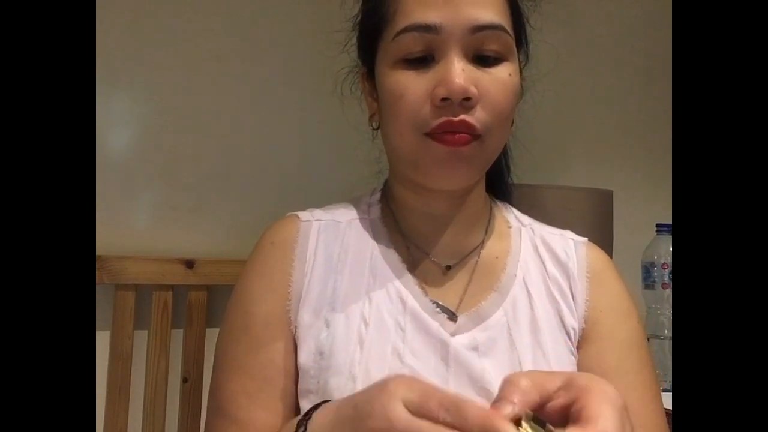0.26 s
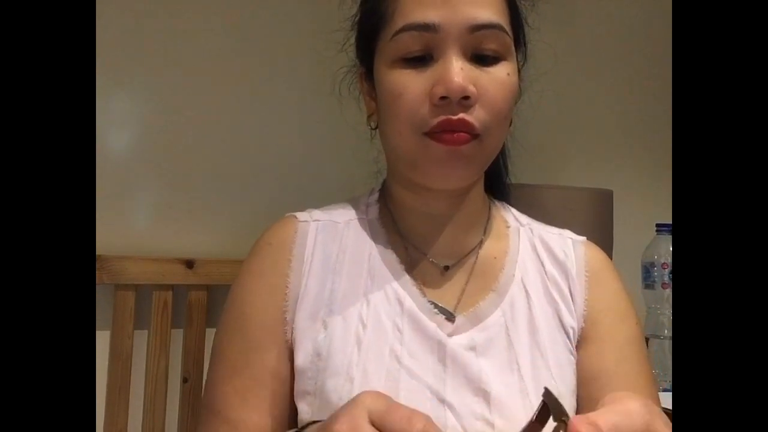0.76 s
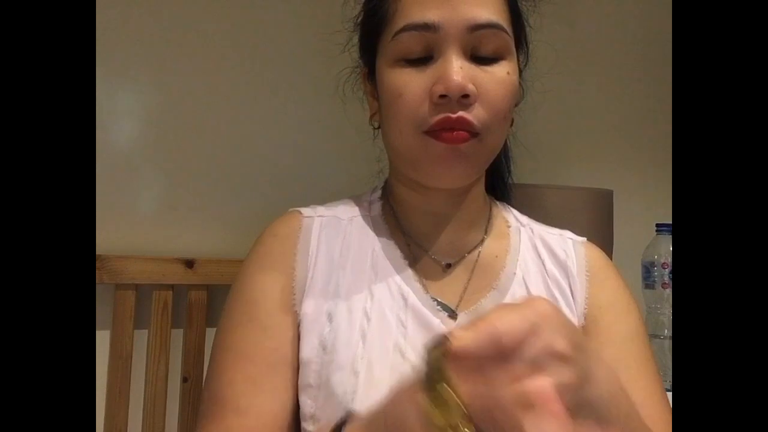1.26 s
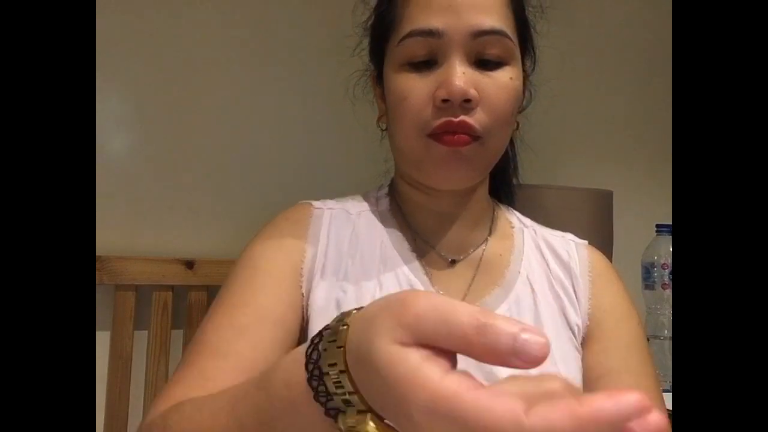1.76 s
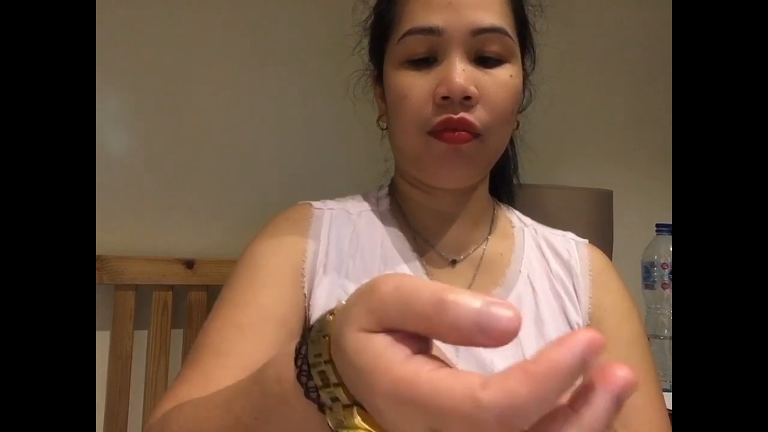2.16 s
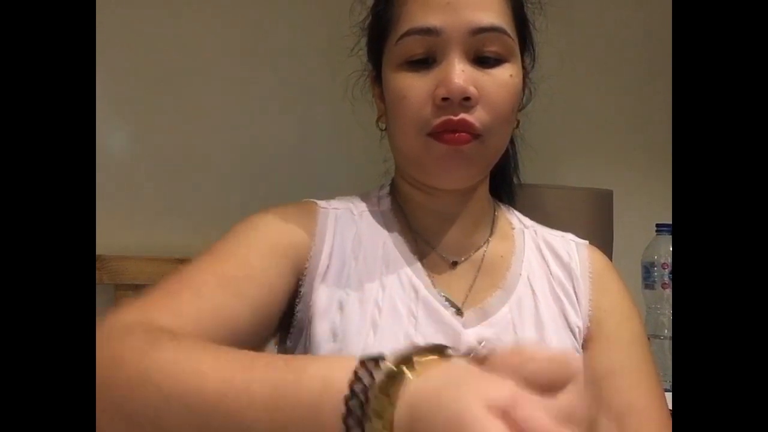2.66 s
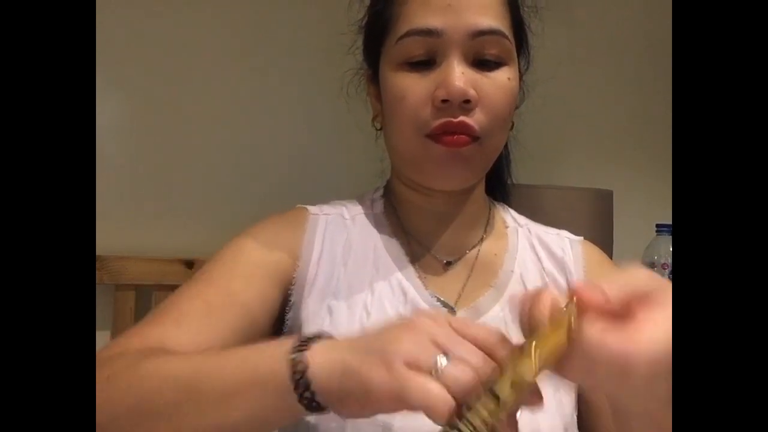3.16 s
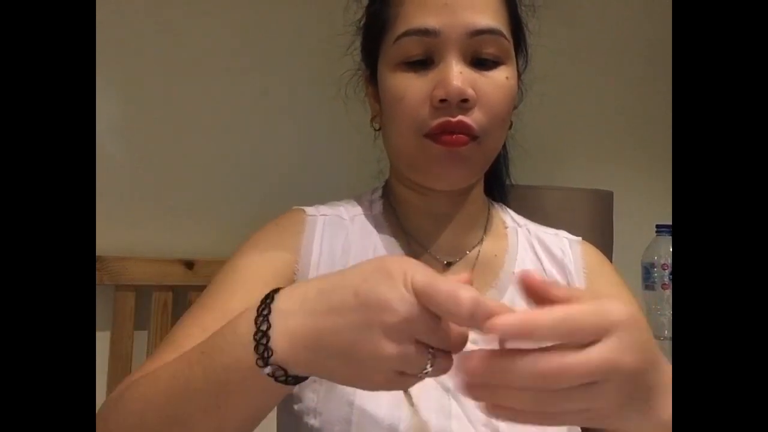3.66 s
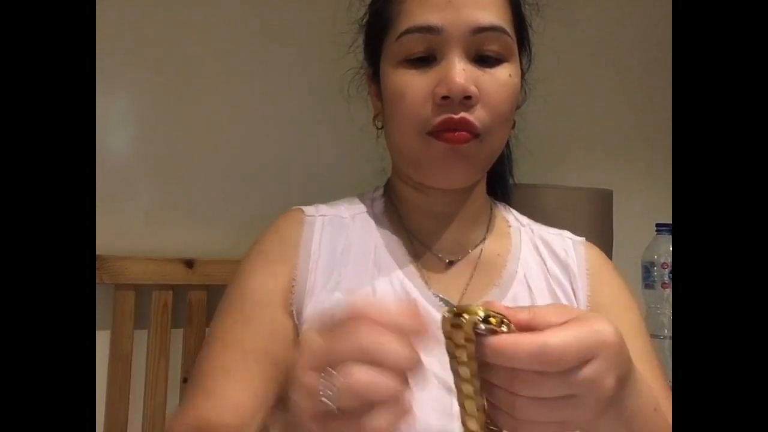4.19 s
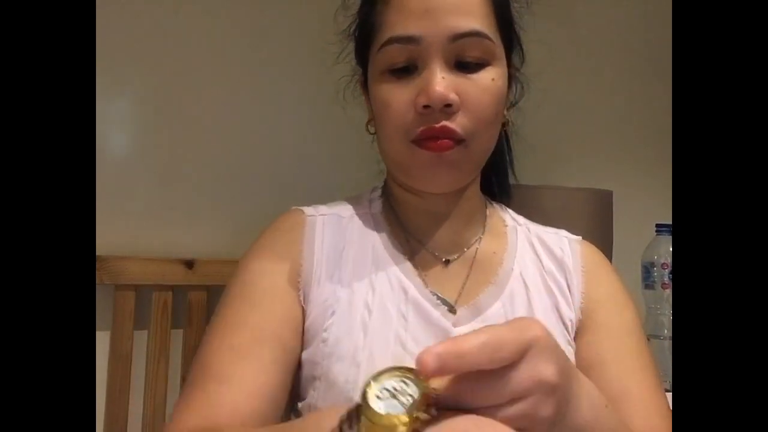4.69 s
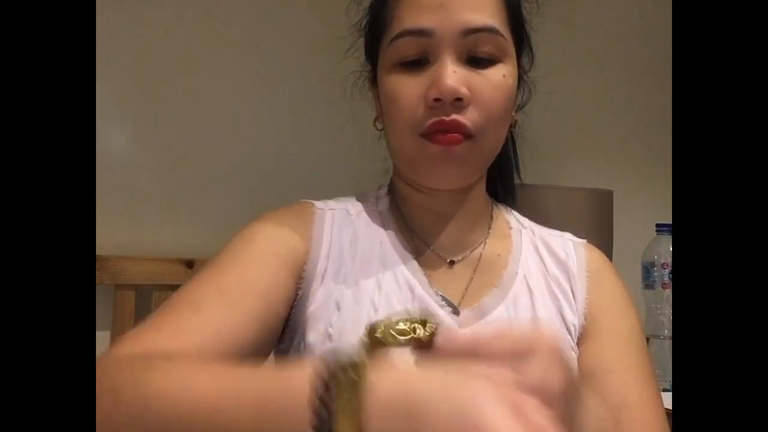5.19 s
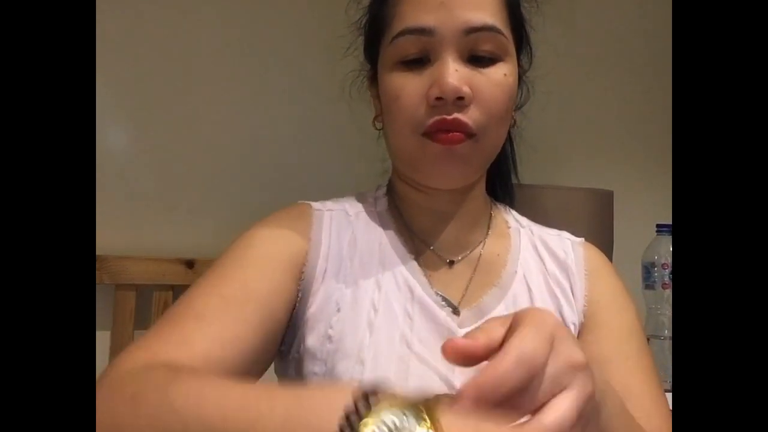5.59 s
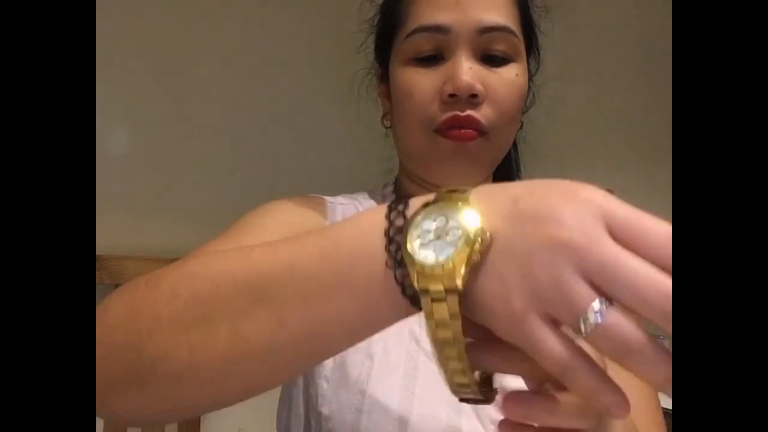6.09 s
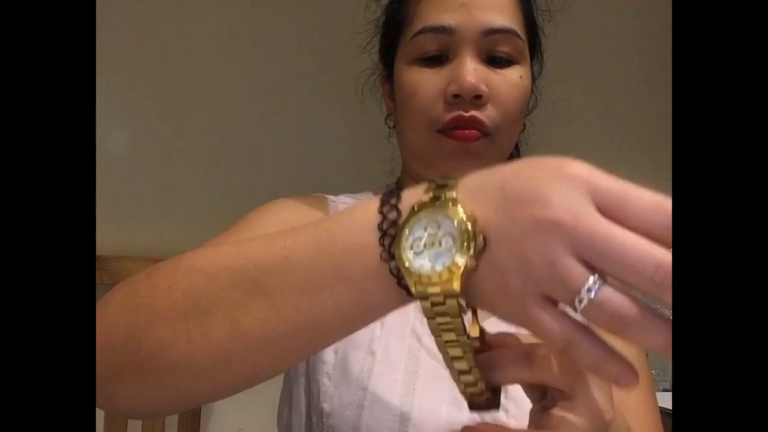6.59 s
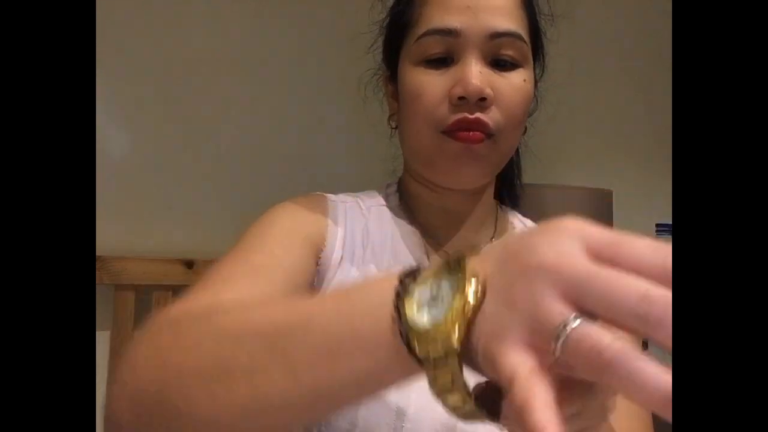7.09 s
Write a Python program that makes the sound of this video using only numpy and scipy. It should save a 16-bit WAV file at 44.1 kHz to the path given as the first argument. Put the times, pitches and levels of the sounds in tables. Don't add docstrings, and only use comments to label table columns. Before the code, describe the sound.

Close, dry handling of a metal watch band: short damped clicks with tiny high rings, small dull knocks from the case and fine jingling links. Two strong clicks come early, another near one second, and sharp snaps in the middle; later the touches are fainter and more scattered, with a dull knock and click near the end. Steady low duct rumble and faint hiss lie beneath, in a small furnished room.

```python
import sys
import numpy as np
from scipy import signal
from scipy.fft import rfft, irfft
from scipy.io import wavfile
from scipy.ndimage import uniform_filter1d

SR = 44100
rng = np.random.default_rng(int(sys.argv[2]) if len(sys.argv) > 2 else 0)


def bounce(signal):
    frames = np.transpose(np.atleast_2d(signal))
    limited = np.clip(frames, -1, 1)
    pcm = np.round(limited * 32767).astype(np.int16)
    wavfile.write(sys.argv[1], SR, pcm)


def volts_from_db(level):
    exponent = np.asarray(level, float) / 20
    return 10 ** exponent


N = 323717
BLOW_N = 1800
BLOW_T = np.arange(BLOW_N) / SR


def rms_one(x):
    return x / np.sqrt(np.mean(x ** 2) + 1e-20)


def in_time(rows):
    s, value = np.transpose(rows)
    return np.interp(np.arange(N) / SR, s, value)


def at_hz(points, hz):
    table_hz, value = np.transpose(points)
    return np.interp(np.log(hz), np.log(table_hz), value)


def band(x, low_hz, high_hz, order=2):
    edges = [low_hz, min(high_hz, .45 * SR)]
    return signal.sosfilt(signal.butter(order, edges, "band", fs=SR, output="sos"), x)


def dip(x, hz, sharpness, depth):
    peak = signal.lfilter(*signal.iirpeak(hz, sharpness, fs=SR), x)
    return x - np.clip(depth, 0, 1) * peak


def steady(spectrum):
    hz = np.maximum(np.fft.rfftfreq(N, 1 / SR), 1)
    white = rfft(rng.standard_normal(N))
    return rms_one(irfft(white * volts_from_db(at_hz(spectrum, hz)), N))


# t/s, level/dB
RUMBLE_SWELL = [(0, -44), (.7, -43), (1.0, -41), (1.4, -43), (1.62, -41.5), (1.9, -44), (4.3, -42.5),
                (4.6, -44.5), (5.1, -42.5), (5.9, -43.5), (6.4, -43), (6.6, -45), (7.25, -40.5),
                (7.34, -45.5)]
# f/Hz, density/dB per Hz
RUMBLE_COLOUR = [(8, -12.5), (15, -16.5), (24, 3), (31, -3.5), (40, -0.5), (50, 4.5), (62, 0), (79, -7.5),
                 (99, -12), (120, -40), (170, -37), (300, -87)]


def ventilation():
    return volts_from_db(in_time(RUMBLE_SWELL)) * steady(RUMBLE_COLOUR)


# f/Hz, density/dB per Hz
AIR_COLOUR = [(65, -54), (110, -5), (141, -9.5), (224, -8.5), (348, -16), (404, -17), (576, -25),
              (1250, -27.5), (4140, -31.5), (4890, -32.5), (8610, -33), (10400, -33.5), (11300, -34.5),
              (15200, -32.5), (16500, -38)]


def air_and_hiss():
    return volts_from_db(-61.5) * steady(AIR_COLOUR)


# t/s, level/dB
HANDLING = [(0.0, -83), (0.8, -76), (1.04, -54), (1.29, -53), (1.47, -71), (1.71, -57.5), (1.95, -79),
            (2.3, -69), (2.7, -52.5), (3.02, -71), (3.5, -51.5), (3.8, -78), (4.03, -59), (4.6, -57.5),
            (5.2, -66), (5.87, -58), (6.25, -70), (7.34, -77)]
# f/Hz, level/dB, t60/s
SMALL_LINKS = [(4100, -8, .004), (6100, -8, .004), (7300, -8, .004), (8450, -12, .01), (9400, -4, .006),
               (11500, 0, .004), (12600, -1, .004), (13700, 0, .004), (15300, -2, .006)]


def chatter(per_s, spread_db):
    sizes = volts_from_db(spread_db * np.minimum(rng.exponential(1, N), 3)) * rng.choice([-1, 1], N)
    touches = sizes * (rng.random(N) < per_s / SR) + 1e-18
    wash = volts_from_db(-5.0) * band(touches, low_hz=7100, high_hz=15800)
    wash = wash + volts_from_db(3.5) * band(touches, low_hz=1500, high_hz=5900)
    for hz, level_db, t60 in SMALL_LINKS:
        decay = volts_from_db(-60 / (t60 * SR))
        turn = 2 * np.pi * hz / SR
        struck = touches * rng.standard_normal(N)
        gain = volts_from_db(level_db - 10.0) * np.sin(turn)
        wash = wash + signal.lfilter([0, gain], [1, -2 * decay * np.cos(turn), decay ** 2], struck)
    return volts_from_db(in_time(HANDLING) - 14.5) * rms_one(wash)


# f/Hz, t60/s
ROOM_T60 = [(1000, 0.22), (2600, 0.25), (7000, 0.27), (15000, 0.28)]


def room_tail(size):
    t = np.arange(size) / SR
    tail = np.zeros(size)
    for hz in 600 * 2. ** np.arange(6):
        octave = band(rng.standard_normal(size), hz / np.sqrt(2), hz * np.sqrt(2))
        tail += octave * volts_from_db(-60 * t / at_hz(ROOM_T60, hz))
    tail = tail * (1 - np.exp(-(t / 0.0048) ** 2))
    return tail / np.sqrt(np.sum(tail ** 2))


# delay t/s, level/dB
ECHOES = [
    (.003, -15),
    (.0007, -13),
    (.0016, -13),
    (.0095, -17),
]


def near_echoes(x):
    return x + sum(volts_from_db(db) * np.roll(x, round(s * SR)) for s, db in ECHOES)


def contact(rebound_db, t60):
    touch = volts_from_db(rebound_db - 60 * BLOW_T / t60) * rng.standard_normal(BLOW_N)
    touch[0] = 1
    return touch


def ring(hz, t60):
    mode = volts_from_db(-60 * BLOW_T / t60) * np.sin(2 * np.pi * hz * BLOW_T)
    return band(mode, low_hz=.75 * hz, high_hz=1.35 * hz, order=3)


def add(direct, feed, s, sound, radiated, room_db):
    at = slice(round(s * SR), round(s * SR) + BLOW_N)
    direct[at] += sound
    feed[at] += volts_from_db(room_db + 19.5) * radiated


# t/s, level/dB
BLADE = [
    (0.912, -46),
    (1.0281, -58),
    (1.4165, -54),
    (2.181, -52),
    (3.19, -54),
    (3.2893, -41),
    (4.0024, -48),
    (4.0837, -49),
    (4.5185, -50),
    (7.0722, -53),
]


def clasp_blade(direct, feed):
    for s, level_db in BLADE:
        blade = volts_from_db(level_db) * ring(hz=8470, t60=0.022)
        add(direct, feed, s, blade, blade, room_db=-18.5)


# t/s, level/dB, f/Hz, t60/s, room share/dB
PLATES = [(.3547, -47, 1750, .008, -24), (.3547, -44, 4520, .004, -23), (.3742, -33, 8300, .003, -27),
          (.3547, -44, 6100, .003, -22), (.4698, -40, 2500, .003, -27), (.4698, -39, 3940, .006, -24),
          (.4698, -44, 5800, .02, -23), (.4816, -41, 6800, .01, -20), (.4698, -40, 8050, .006, -22),
          (1.1312, -41, 4040, .007, -17), (1.1325, -30, 6050, .012, -16), (1.1312, -38, 8100, .007, -15),
          (2.7629, -46, 1300, .01, -24), (2.7629, -47, 1890, .01, -21), (2.7629, -43, 2570, .012, -20),
          (2.7629, -46, 5300, .005, -16), (2.7629, -44, 6400, .006, -20), (3.516, -50, 3370, .02, -20),
          (3.5142, -40, 8200, .012, -20), (3.516, -54, 4300, .006, -22), (4.2483, -43, 12100, .006, -24),
          (4.364, -55, 4100, .012, -26), (4.422, -60, 3900, .008, -16), (4.497, -54, 9600, .012, -22),
          (4.505, -53, 9500, .008, -24), (4.5195, -49, 9500, .015, -16), (5.2314, -49, 6700, .012, -20),
          (5.2314, -57, 3700, .012, -18), (5.101, -53, 7000, .008, -20), (6.849, -53, 1900, .008, -24),
          (6.853, -57, 2800, .02, -22), (6.8413, -47, 6300, .008, -20), (.7958, -50, 6200, .005, -22),
          (1.273, -53, 8450, .015, -22), (1.2875, -52, 6800, .005, -18), (1.2865, -49, 13800, .004, -20),
          (2.2755, -53, 8700, .03, -18), (6.85, -45, 15400, .006, -20), (1.5215, -51, 7300, .006, -24),
          (6.0815, -55, 6300, .005, -14)]


def plates(direct, feed):
    for s, level_db, hz, t60, room_db in PLATES:
        plate = volts_from_db(level_db) * ring(hz, t60)
        add(direct, feed, s, plate, plate, room_db)


# t/s, level/dB, f/Hz, room share/dB
PARTS = [(0.3545, -29, 2920, -30), (.3547, -39, 5170, -24), (.3547, -40, 500, -35),
         (0.4696, -24, 13000, -22), (0.4696, -23, 10830, -26), (0.912, -39, 4630, -35),
         (1.1313, -24.5, 5530, -22), (1.1312, -30, 6860, -8.5), (1.1314, -34, 10200, -26),
         (1.5192, -26, 15800, -29), (1.7565, -42, 7270, -15.5), (1.9037, -38, 15500, -23),
         (2.531, -49, 5800, -15), (2.7612, -42, 2880, -23), (3.289, -40, 6100, -28),
         (3.2898, -39.5, 4060, -34), (3.2891, -20, 13500, -46), (3.2891, -21, 9370, -32),
         (3.5142, -45, 5700, -26), (3.5158, -29, 8700, -24), (4.2397, -32.5, 8470, -29),
         (4.4147, -53, 3940, -12), (5.271, -54, 2780, -18), (6.829, -46, 3900, -30),
         (6.8361, -47, 6240, -21), (6.8405, -42.5, 2360, -17), (6.8397, -47, 6400, -19),
         (6.8397, -34, 12800, -16), (7.3294, -45.5, 3400, -25), (7.33, -34, 14500, -14)]


def small_parts(direct, feed):
    for s, level_db, hz, room_db in PARTS:
        part = volts_from_db(level_db) * ring(hz, t60=0.0047)
        add(direct, feed, s, part, part, room_db)


# t/s, level/dB, room share/dB
THUDS = [(0.3547, -40, -22.5), (0.3742, -55, -28), (0.4693, -43.5, -24.5), (0.4813, -60, -17),
         (0.914, -64, -14), (1.028, -60.5, -11.5), (1.1312, -56, -13), (2.171, -61, -23),
         (2.7629, -46.5, -21), (3.5142, -56.5, -20), (4.0025, -60.5, -24), (4.0837, -62, -15),
         (4.2391, -62, -18), (4.311, -60, -15), (4.4163, -76, -26), (5.273, -55, -17.5),
         (5.8458, -59.5, -16.5), (5.891, -62, -18), (6.4343, -47, -25), (6.444, -65, -23),
         (6.8397, -50.5, -16.5)]


def case_thuds(direct, feed):
    case_hz = 1870
    for s, thud_db, room_db in THUDS:
        case = band(contact(rebound_db=-24, t60=.006), low_hz=.4 * case_hz, high_hz=2.1 * case_hz)
        case = volts_from_db(thud_db + 25) * case
        add(direct, feed, s, case, case, room_db)


# f/Hz, t60/s
RING_T60 = [(4000, .004), (6200, .005), (7300, .006), (8450, .016), (9400, .007), (11000, .004),
            (13500, .003), (15300, .005)]
# t/s, crack level/dB, link f/Hz, clasp body/dB, room share/dB
FITTING_KNOCKS = [(0.3543, -33, 13700, -9.5, -20), (0.3737, -33, 12700, -9, -26),
                  (0.4696, -24.5, 10940, -14, -17), (0.4816, -30, 6400, -12, -22),
                  (0.7955, -42.5, 13200, -13.5, -16.5), (0.9127, -32, 9300, -16, -19),
                  (0.9222, -39, 8470, -24, -13), (0.964, -47.5, 13500, -11, -10.5),
                  (1.0284, -37, 8370, -15, -15), (1.033, -38, 14100, -21, -19),
                  (1.0575, -39, 14000, -22, -31), (1.1311, -27, 6470, -28, -21),
                  (1.239, -44, 13500, -17, -31), (1.2805, -36.5, 13400, -14.5, -21),
                  (1.2916, -41, 14300, -17, -29), (1.416, -46.5, 9650, -13, -13.5),
                  (1.5192, -49.5, 15800, -18, -13.5), (1.5544, -43.5, 8970, -21, -18),
                  (1.757, -45, 15500, -22, -20), (1.9037, -52, 15600, -22, -20),
                  (2.3173, -44, 10700, -12.5, -17.5), (2.531, -39.5, 12700, -23, -25)]
# t/s, crack level/dB, link f/Hz, clasp body/dB, room share/dB
TURNING_KNOCKS = [(2.7341, -45, 11000, -14, -36), (2.7629, -33.5, 11900, -17, -17.5),
                  (3.1896, -41, 13600, -17, -20), (3.2105, -44.5, 14500, -12, -25),
                  (3.2891, -25.5, 9370, -20, -23), (3.4222, -44.5, 11610, -16, -25),
                  (3.4704, -39, 13370, -22, -21), (3.4768, -39, 9500, -17, -21),
                  (3.5142, -26, 11800, -18, -16), (3.7649, -38, 14900, -19, -21),
                  (3.7674, -41, 9200, -24, -16.5), (3.9552, -45, 12000, -14.5, -19),
                  (4.0023, -32, 14400, -20, -18), (4.0434, -38, 14400, -26, -21),
                  (4.0837, -33, 12300, -15.5, -19), (4.2391, -30, 15100, -21, -21.5),
                  (4.2483, -49, 14700, -20, -22), (4.329, -46, 13500, -12.5, -10),
                  (4.3347, -42, 14500, -14, -19), (4.4163, -38.5, 15000, -13.5, -18),
                  (4.5195, -44, 9500, -17, -19), (4.6583, -46, 12500, -14.5, -14)]
# t/s, crack level/dB, link f/Hz, clasp body/dB, room share/dB
SHOWING_KNOCKS = [(5.0961, -47, 13630, -10, -14), (5.2312, -37, 9650, -21.5, -11.5),
                  (5.273, -37.5, 7330, -10.5, -23), (5.347, -46, 11330, -22, -19),
                  (5.377, -45.5, 8440, -22, -13.5), (5.7586, -39.5, 10100, -23, -13),
                  (5.808, -43, 13540, -17, -22), (5.8457, -47, 13650, -16, -20),
                  (5.8914, -42, 11460, -17, -24), (5.9245, -48, 13700, -15, -31),
                  (5.9522, -43, 10100, -20, -12), (6.435, -47.5, 12100, -1.5, -20.5),
                  (6.6513, -45.5, 11600, -8.5, -24), (6.8397, -35, 15000, -11, -15),
                  (7.3294, -33.5, 12300, -22, -14)]
# t/s, crack level/dB, link f/Hz
EARLY_TICKS = [(0.033, -47.5, 6500), (0.628, -52, 11800), (0.6986, -57, 13310), (0.76, -56, 13850),
               (0.828, -45, 12550), (0.9934, -50, 14000), (1.0194, -46, 15310), (1.506, -51, 11000),
               (1.6641, -46.5, 14470), (1.7075, -51, 12500), (1.7424, -56, 12580), (2.154, -56, 5000),
               (1.92, -47.5, 10830), (2.1708, -48, 11900), (2.182, -45.5, 14600), (2.275, -48, 14000),
               (2.486, -54, 12830), (2.7524, -54, 11630), (2.9464, -48, 11800), (2.9546, -55, 15290),
               (3.017, -48, 10060), (3.0377, -54, 12420), (3.2385, -46, 8400), (3.258, -45, 11500),
               (3.4066, -49, 13650), (3.419, -48, 14130), (3.4666, -52, 9860), (3.7105, -49.5, 13600)]
# t/s, crack level/dB, link f/Hz
LATE_TICKS = [(4.199, -51, 7100), (4.3105, -54, 5540), (4.318, -42, 14320), (4.495, -47, 9500),
              (4.5975, -53, 11740), (4.6288, -45.5, 9600), (4.8303, -47.5, 11480), (5.001, -52, 11800),
              (5.061, -53, 15200), (5.108, -53, 9000), (5.4057, -52, 8400), (5.522, -51.5, 13000),
              (5.74, -50, 11800), (5.8, -47, 9300), (5.8391, -45, 13630), (5.8846, -46, 14500),
              (6.076, -48.5, 6900), (6.2222, -47, 11400), (6.226, -49, 13800), (6.2758, -52, 11500),
              (6.316, -54, 14200), (6.444, -48, 7150), (6.6676, -54, 9170), (6.9758, -50.5, 8100),
              (7.073, -51, 8240), (7.1184, -50, 8900), (7.218, -54.5, 6610), (7.3234, -51, 8770)]
# t/s, crack level/dB, link f/Hz
REBOUNDS = [(1.046, -50, 15000), (1.166, -42, 12400), (1.7585, -47, 15500), (1.7586, -43.5, 14100),
            (1.769, -42, 15500), (1.803, -49, 12500), (1.913, -49.5, 10700), (4.409, -47, 8660),
            (5.233, -42, 15000), (5.2776, -43, 13600), (5.272, -47, 11600), (5.773, -54, 12000),
            (5.8465, -54, 13200), (6.8362, -48, 13500), (6.8413, -41, 12100), (6.866, -41, 15500)]


def link_knocks(direct, feed):
    impulse = 1. * (BLOW_T == 0)
    even_bright = volts_from_db(12) * band(impulse, low_hz=7630, high_hz=20200, order=6)
    even_clasp = band(impulse, low_hz=3240, high_hz=7030, order=3)
    even_clasp = volts_from_db(25.0) * dip(even_clasp, hz=5060, sharpness=4.5, depth=0.3)

    blows = [(s, db, hz, 1, clasp_db, room_db)
             for s, db, hz, clasp_db, room_db in FITTING_KNOCKS + TURNING_KNOCKS + SHOWING_KNOCKS]
    blows += [(s, db, hz, -1.5, -15.5, -18) for s, db, hz in EARLY_TICKS + LATE_TICKS]
    blows += [(s, db, hz, 4, -19, -18.5) for s, db, hz in REBOUNDS]

    for s, crack_db, ring_hz, ring_db, clasp_db, room_db in blows:
        touch = contact(rebound_db=-12, t60=.006)
        bright = volts_from_db(9.5) * band(touch, low_hz=8100, high_hz=18700, order=6)
        clasp = volts_from_db(clasp_db + 22.5) * band(touch, low_hz=2900, high_hz=8100, order=3)
        t60 = at_hz(RING_T60, ring_hz)
        link = volts_from_db(ring_db + 3) * np.sqrt(0.0047 / t60) * ring(ring_hz, t60)
        sound = bright + clasp + link
        radiated = even_bright + volts_from_db(clasp_db) * even_clasp + volts_from_db(-7.5) * link
        add(direct, feed, s, volts_from_db(crack_db) * sound, volts_from_db(crack_db) * radiated, room_db)


def scene():
    background = ventilation() + air_and_hiss()
    small = chatter(per_s=1000.0, spread_db=-2.0)
    direct, feed = np.zeros((2, N + BLOW_N))
    for source in (clasp_blade, plates, small_parts, case_thuds, link_knocks):
        source(direct, feed)
    direct, feed = direct[:N], feed[:N]
    room = signal.fftconvolve(feed + volts_from_db(2.5) * small, room_tail(size=16000))[:N]
    return (near_echoes(direct) + room + small + background)[None]


def top_cut(x):
    return signal.sosfilt(signal.butter(12, 16960, fs=SR, output="sos"), x)


def record(dry):
    dipped = dip(dry, hz=10340, sharpness=20.0, depth=0.48)
    stepped = signal.sosfilt(signal.cheby2(18, 32, 15960, fs=SR, output="sos"), dipped)
    top = band(dipped, low_hz=15950, high_hz=17500, order=8)
    sudden = uniform_filter1d(top ** 2, size=100) > volts_from_db(16) * uniform_filter1d(top ** 2, size=2000)
    stepped = stepped + volts_from_db(-5) * uniform_filter1d(sudden * 1., size=60) * top
    mix = signal.sosfilt(signal.cheby2(14, 70, 17000, fs=SR, output="sos"), stepped)
    return top_cut(mix)


dry = scene()
out = record(dry)
bounce(out)
```